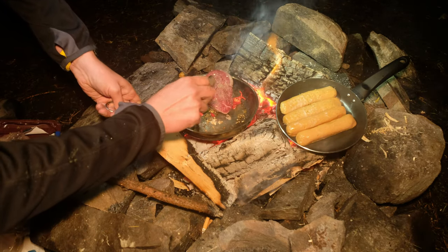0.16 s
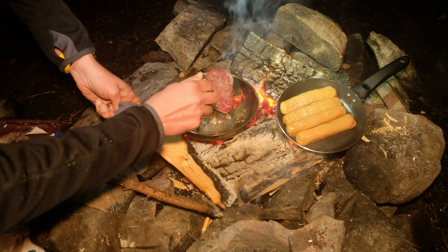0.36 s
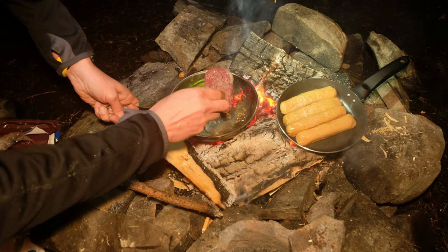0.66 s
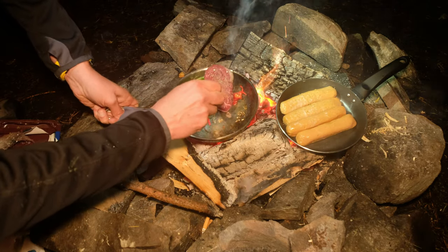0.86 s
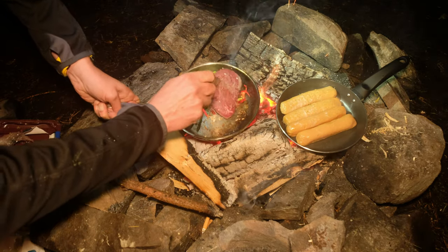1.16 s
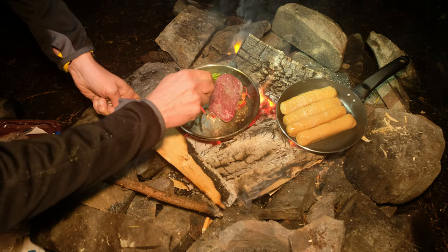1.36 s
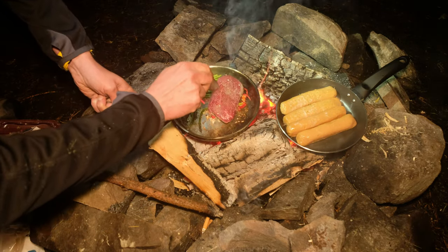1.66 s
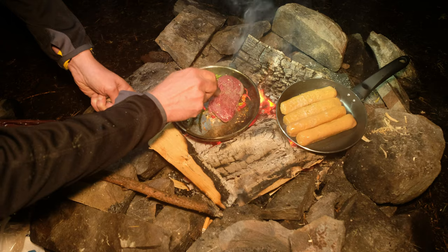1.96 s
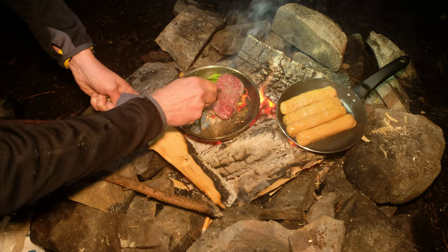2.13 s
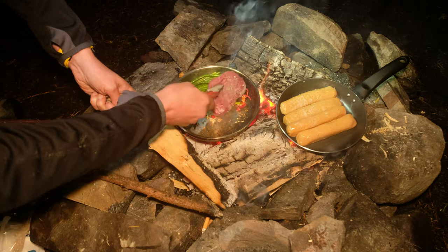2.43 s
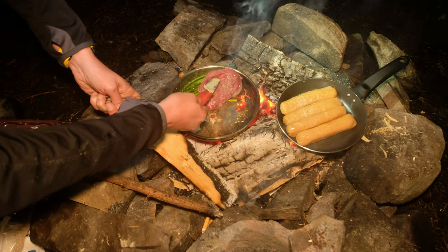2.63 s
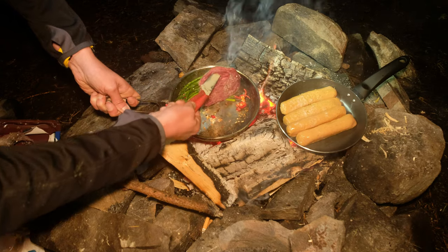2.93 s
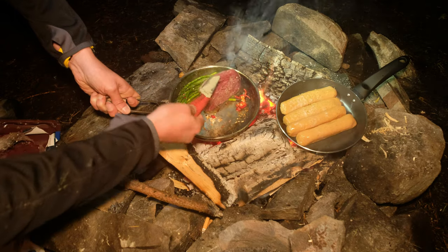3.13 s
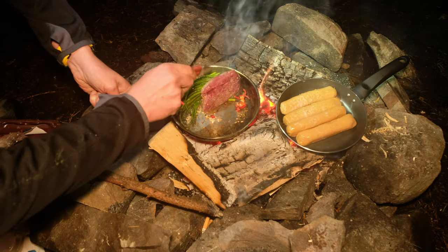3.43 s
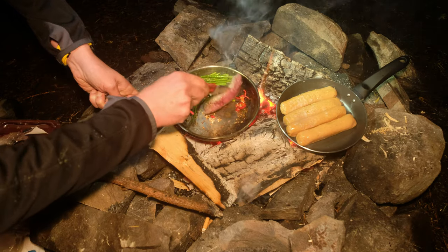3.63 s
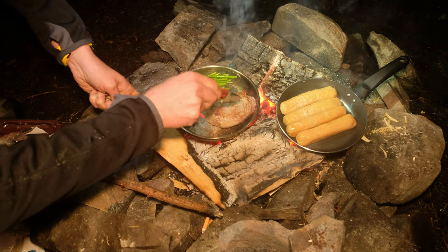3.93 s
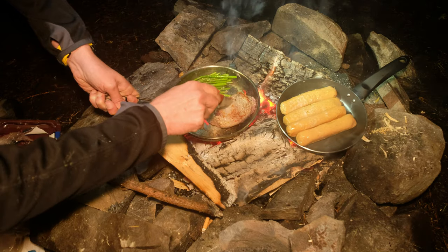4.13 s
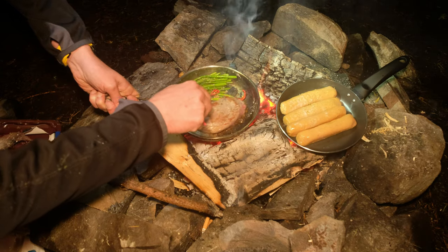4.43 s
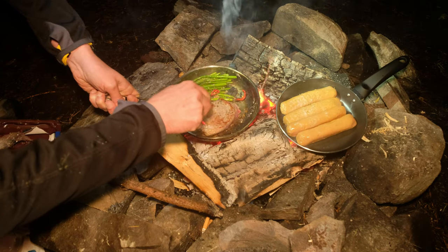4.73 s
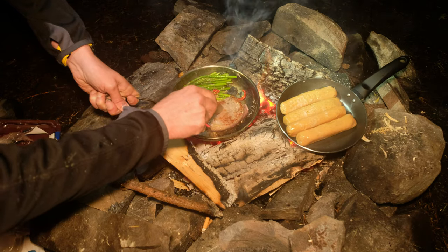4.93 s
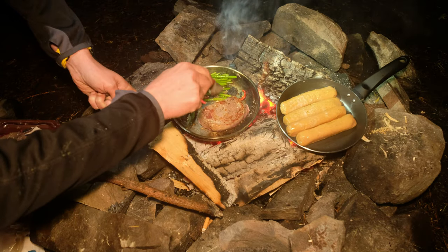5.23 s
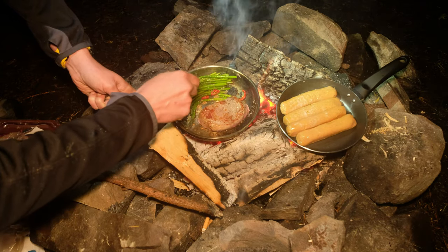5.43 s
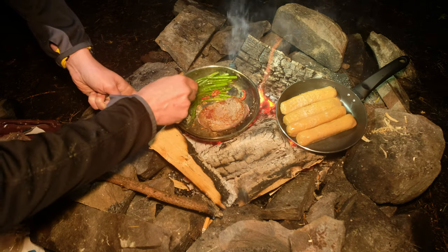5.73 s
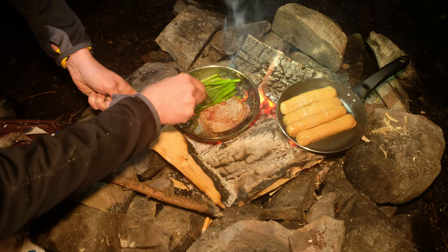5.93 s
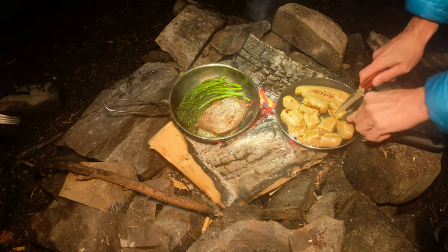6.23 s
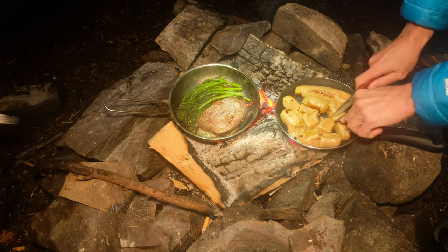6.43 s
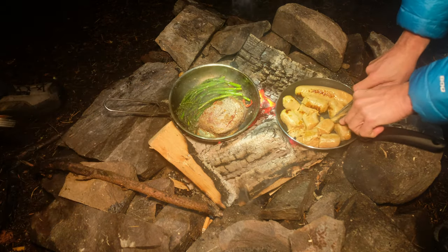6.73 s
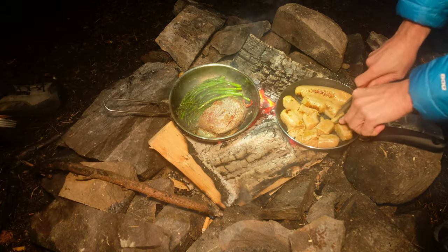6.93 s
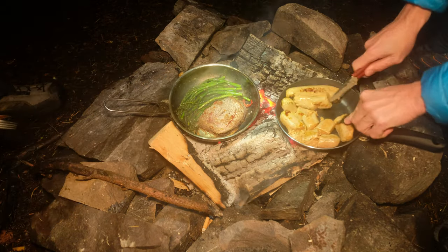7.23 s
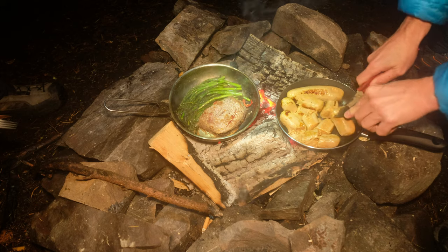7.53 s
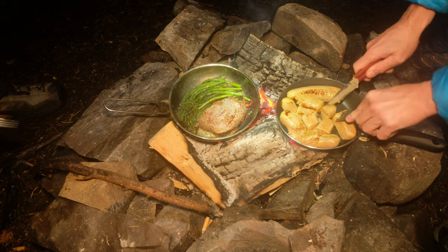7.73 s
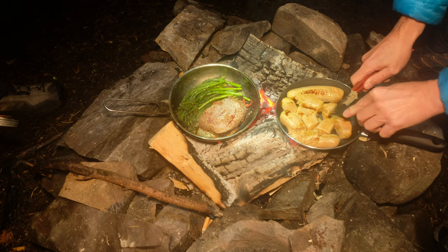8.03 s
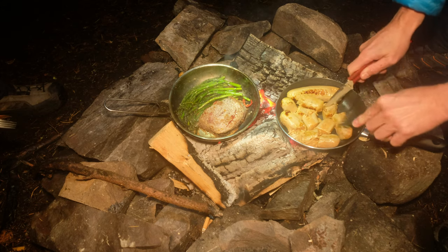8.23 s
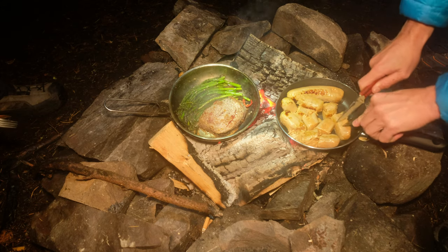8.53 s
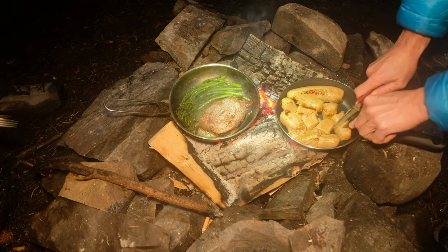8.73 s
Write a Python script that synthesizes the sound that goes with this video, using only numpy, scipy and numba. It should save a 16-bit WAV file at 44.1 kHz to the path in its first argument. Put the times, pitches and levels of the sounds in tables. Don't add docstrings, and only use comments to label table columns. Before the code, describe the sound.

Meat sizzles fiercely in a steel pan over a campfire, spitting and popping, then cuts abruptly to a much quieter simmer with knife knocks.

```python
import sys
import numpy as np
from scipy import signal
from scipy.fft import rfft, irfft
from scipy.io import wavfile
from scipy.ndimage import uniform_filter1d
from numba import njit

SR = 44100
rng = np.random.default_rng(int(sys.argv[2]) if len(sys.argv) > 2 else 0)


def natural_amplitude(level_db):
    exponent = np.asarray(level_db, float) / 20
    return 10 ** exponent


def unload_audio(sound):
    columns = np.transpose(np.atleast_2d(sound))
    steps = np.round(np.clip(columns, -1, 1) * 32767)
    wavfile.write(sys.argv[1], SR, steps.astype(np.int16))


N = 391166
CHANGE_S = 6.099


def grid():
    return np.arange(N) / SR


def by_pan(first, second):
    return np.where(grid() < CHANGE_S, first, second)


def unit(x):
    return x / np.sqrt(np.mean(x ** 2))


def walk(rate_hz):
    hold = int(SR / rate_hz)
    levels = np.repeat(rng.standard_normal(N // hold + 1), hold)
    return 0.53 * uniform_filter1d(levels, hold)[:N]


def colour(x, hz, db):
    f = np.arange(1, N // 2 + 2) * SR / N
    return irfft(rfft(x) * natural_amplitude(np.interp(np.log(f), np.log(hz), db)), N)


def band(x, low_hz, high_hz):
    return signal.sosfilt(signal.butter(2, [low_hz, high_hz], "bandpass", fs=SR, output="sos"), x)


@njit
def rings(start, hz, decay, size, glide, tilt):
    out = np.zeros(N + 1)
    for k in range(len(start)):
        i = start[k]
        w = 2 * np.pi * hz[k] / SR
        p = decay[k] * np.exp(1j * w)
        g = np.exp(1j * w * w * glide / (2 * np.pi))
        z = size[k] * np.exp(1j * tilt) * 1j * (1 - p) / abs(1 - p)
        floor = 0.003 * abs(size[k])
        while i < N and abs(z) > floor:
            out[i] += z.real
            z, p, i = z * p, p * g, i + 1
    return out[:N]


def burst(s, hz, t60_s, size, glide=0., tilt=0.):
    hz = np.clip(hz, 0, 0.42 * SR)
    decay = np.exp(-np.log(1000) / (np.maximum(t60_s, 4 / SR) * SR)) + 0 * hz
    return rings((np.asarray(s) * SR).astype(np.int64), hz, decay, size + 0 * hz, glide, tilt)


def puffs(s, t60_s, db):
    envelope = burst(s, 0 * np.asarray(s), t60_s, natural_amplitude(db), tilt=np.pi / 2)
    return envelope * rng.standard_normal(N)


# frequency in Hz, density in dB per Hz.
FLAME_SPECTRUM = [(12, -47), (20, -12.5), (134, -5), (187, -2), (343, -4.5), (420, -18), (500, -3.5),
                  (650, -9), (1100, -120)]


def fire():
    roar = colour(rng.standard_normal(N), *np.transpose(FLAME_SPECTRUM))
    return unit(roar) * natural_amplitude(by_pan(-58, -64) + 2.3 * walk(1.28) + 0.86 * walk(3.1))


# time in seconds, pitch in Hz, level in dB.
STEAM_JET = [
    (6.905, 4000, -50),
    (6.92, 3800, -36),
    (6.95, 3250, -36),
    (6.972, 2850, -45),
]


def squeak():
    s, hz, db = np.transpose(STEAM_JET)
    on = (grid() > s[0]) * (grid() < s[-1])
    pitch_hz = np.interp(grid(), s, hz) * (1 + 0.01 * walk(180))
    phase = 2 * np.pi * np.cumsum(pitch_hz) / SR
    return on * natural_amplitude(np.interp(grid(), s, db) + 4 * walk(90)) * np.sin(phase)


# frequency in Hz, level in dB, T60 in seconds.
PAN_MODES = [(734, -16.5, 0.084), (1055, -19, 0.082), (1344, -11, 0.14), (1780, -8, 0.045),
             (2430, -4, 0.025), (2995, -0.5, 0.037), (3360, -8, 0.056), (3900, -25, 0.063),
             (4230, -14, 0.02), (4800, -23, 0.081), (5740, -27, 1.7), (6270, -7, 0.0088), (6840, -20, 0.11),
             (7800, -31, 0.062)]
CHATTER_S = 0.0028


def clanks():
    hz, mode_db, t60_s = np.transpose(PAN_MODES)
    t60_s = np.minimum(t60_s, 0.06)
    first_s, second_s = 6.8235, 6.8675
    out = burst([6.87], np.array([190.]), 0.081, natural_amplitude(-28), tilt=-np.pi / 2)
    out = out + band(puffs([first_s + CHATTER_S], 0.15, -18), 150, 1300)
    for s, db in ((first_s, -7), (second_s, -19)):
        scrape = rng.standard_normal(N) * (grid() > s) * (grid() < s + CHATTER_S)
        out = out + natural_amplitude(db - 0.5) * band(scrape, 2400, 7300)
        out = out + band(puffs([s], 0.1, db - 8), 2700, 6200)
        for step in (0, 0.6, 0.9):
            contact_s = s + step * CHATTER_S + 0 * hz
            out = out + burst(contact_s, hz, t60_s, natural_amplitude(db + mode_db - 5.5), tilt=6 * step)
    return out


# time in seconds, peak in dB, low mode in Hz, high mode in Hz,
# high mode level in dB.
KNIFE_KNOCKS = [(0.49, -21.5, 553, 1360, 5), (0.706, -23, 490, 1130, 7), (0.782, -20.5, 516, 581, 4),
                (1.109, -27, 347, 1280, -3), (3.55, -27, 400, 756, 6), (5.369, -11.5, 423, 825, 0),
                (5.42, -15, 385, 660, 13.5), (5.478, -13, 387, 760, 7), (5.954, -14.5, 504, 1160, 0),
                (6.579, -28.5, 480, 947, 6), (6.657, -23.5, 483, 1100, 18.5), (6.768, -39, 495, 1130, 20.5),
                (6.866, -16, 406, 1350, 6), (6.923, -19.5, 372, 720, 3), (6.934, -29, 433, 1140, 11),
                (8.266, -26, 350, 614, -2)]


def knocks():
    s, db, low_hz, high_hz, high_db = np.transpose(KNIFE_KNOCKS)
    t60_s = 0.04
    out = band(puffs(s + 0.0031, 1.1 * t60_s, db - 1.5), 300, 1200)
    for lag_s, blow_db in ((0.0028, -10.5), (0.0135, -32)):
        out = out + burst(s + lag_s, low_hz, 0.66 * t60_s, natural_amplitude(db + blow_db), tilt=-0.64)
        out = out + burst(s + lag_s, high_hz, 0.5 * t60_s, natural_amplitude(db + high_db + blow_db), tilt=-1.45)
    return out


# time in seconds, vigour in dB,
# fineness (share of fine spray) in dB, froth (share of small bubbles) in dB, juice out of the meat in dB.
FRYING = [(0.0, -20, -8, -4.5, -0.2), (1.0, -20.5, -7, -6.5, 1.5), (1.12, -18, -6, -7.5, -0.2),
          (1.32, -17.5, -5, -4.5, 1), (1.92, -20, -4.5, -5.5, 0.2), (2.24, -17, -6.5, -8, 0.4),
          (2.42, -19, -5.5, -6, 3), (2.7, -23, -6, -5, 2.1), (3.12, -18.5, -4, -5.5, 1.5),
          (3.4, -19, -1.5, -6.5, -0.5), (3.98, -22, -4.5, -4, -1.3), (4.32, -20.5, -6.5, -2, -2.2),
          (4.56, -21.5, -4.5, -6, -0.8), (5.0, -18.5, -4.5, -4, -1.8), (5.14, -21.5, -4, -3.5, -0.5),
          (5.64, -21.5, -4, -4, -1), (5.82, -19, -4, -5, 0), (6.098, -20, -4, -4.5, 0.5)]
SIMMERING = [
    (6.14, -34.5, -5, -6, -0.88),
    (7.04, -32.5, -5.5, -5.5, -1),
    (7.67, -32.5, -5.5, -5.5, -1),
    (8.29, -35.5, -5.5, -5.5, -1),
    (8.87, -34.5, -5.5, -5.5, -1),
]


def controls():
    change = [(CHANGE_S, *SIMMERING[0][1:])]
    s, *columns = np.concatenate([FRYING, change, SIMMERING]).T
    return [np.interp(grid(), s, c) for c in columns]


# time in seconds, peak in dB, pitch in Hz.
FIRST_PAN_SPITS = [(0.0604, -5, 3270), (0.4534, -5, 4180), (0.5681, -3, 4310), (0.6904, -3, 2850),
                   (0.7153, -6, 2980), (0.9293, -4, 2850), (1.1734, -4, 3530), (1.3384, -1, 4580),
                   (1.4054, -2, 5300), (1.4604, -4, 4240), (1.5794, -3, 2960), (1.6731, -1, 4160),
                   (1.8971, -3, 3520), (2.14, -4, 2790), (2.2034, -2, 3330), (2.3364, -3, 2910),
                   (2.7237, -8, 2820), (2.9103, -4, 4330), (3.0814, -3, 5140), (3.1114, -1, 6990),
                   (3.7419, -6, 3210), (3.7913, -3, 3020), (4.0926, -4, 5200), (4.1121, -4, 3210),
                   (4.4474, -5, 3250), (4.5634, -5, 4900), (4.6947, -5, 2990), (5.0424, -1, 2880),
                   (5.0689, 1, 2960), (5.6062, -4, 4930)]
SECOND_PAN_SPITS = [(6.1185, -2, 5520), (6.2317, -15, 4540), (6.3234, -16, 6950), (6.334, -14, 6450),
                    (6.3714, -17, 4400), (6.552, -16, 7030), (7.0948, -11, 5470), (7.1074, -15, 4430),
                    (7.1122, -13, 5010), (7.2295, -16, 5470), (7.2973, -13, 5680), (7.5134, -16, 5560),
                    (7.5497, -15, 4190), (7.6291, -11, 5430), (7.8054, -17, 5520), (7.8261, -14, 5350),
                    (7.9633, -15, 5710), (8.1334, -16, 4910), (8.2904, -14, 5810), (8.2994, -14, 6160),
                    (8.3569, -16, 5630), (8.5634, -17, 5080), (8.7784, -19, 4130), (8.8634, -17, 6420)]


def drops():
    small_per_s, lag_s, trim_db = 22, 0.0012, -1
    count = int(small_per_s * N / SR)
    s = rng.random(count) * N / SR
    level_chance, pitch_chance = rng.standard_normal((count, 2)).T
    db = np.interp(s, grid(), controls()[0]) + 12.5 + 1.5 * level_chance
    small = np.array([s, db, 4000 * 2 ** (0.3 * pitch_chance)])
    loud = np.concatenate([FIRST_PAN_SPITS, SECOND_PAN_SPITS]).T + [[lag_s], [trim_db], [0]]
    return np.concatenate([loud, small], axis=1)


def spits():
    s, db, hz = drops()
    loud = np.arange(len(s)) < len(FIRST_PAN_SPITS) + len(SECOND_PAN_SPITS)
    cycles = np.where(loud, 16, 7)
    push = burst(s - 0.35 / hz, hz, 1.5 / hz, natural_amplitude(db - 9), tilt=-0.6)
    suck = burst(s, 0.7 * hz, 4 / hz, -natural_amplitude(db - 7))
    suck = suck + burst(s, 1.7 * hz, 6 / hz, -natural_amplitude(db - 12))
    ring = burst(s, 0.93 * hz, cycles / hz, -natural_amplitude(db - 2), glide=0.025)
    spray = band(puffs(s, 0.016, db - 8.5), 1830, 7100)
    return push + suck + ring + spray


# share in dB, then dB per dB of vigour,
# of fineness, of froth, of juice.
SIZE_RESPONSE = [(-5.5, 0.1, 0.17, 0.23, .3), (-9, 0.26, -0.4, -0.65, 0.71),
                 (-9.5, 0.86, -1.12, -1.04, 1.17), (-4, 0.94, -0.86, -0.42, -0.44),
                 (-4.5, 1.1, -.05, 1.4, 0.13), (-3.5, 1.05, 1.26, -0.15, -0.12), (-4, 1.1, 1.15, .15, 0.12)]


def shares():
    vigour_db, fine_db, froth_db, juice_db = controls()
    usual_db = by_pan(-20, -33.5)
    lull_db = -3.5 * np.exp(-((grid() - 1.04) / 0.022) ** 2)
    swell_db = vigour_db - usual_db + lull_db
    fine_db, froth_db = fine_db + 4.5, froth_db + 5
    return [usual_db + db + a * swell_db + b * fine_db + c * froth_db + d * juice_db
            for db, a, b, c, d in SIZE_RESPONSE]


# pitch in Hz, pitch spread in octaves, ring in cycles, bursts per second,
# size spread in dB, shared pops in dB, trim in dB.
BUBBLE_SIZES = [
    (701, 0.33, 2.7, 2500, 2, -6.5, -17),
    (1335, 0.3, 4, 3000, 3.5, -14.5, -9),
    (2018, 0.15, 3.9, 3500, 2.5, 0.5, -3.5),
    (3079, .15, 6.7, 4500, 2.5, -3.5, -1.5),
    (4920, 0.25, 4.7, 6500, 3., -12.5, -1),
    (7490, 0.306, 5.6, 9000, 2, -14, -1.5),
    (12040, 0.17, 7., 9400, 0, -34, -7),
]


def sizzle():
    seethe_db = 0.46 * walk(14) + 0.98 * walk(60) + 0.45 * walk(250)
    pops = rng.random((14000, 2))
    pop_s = pops[:, 0] * N / SR
    pop_base_db = -3.5 * np.log(pops[:, 1])
    out = 0
    for row, level_db in zip(BUBBLE_SIZES, shares()):
        hz, spread, cycles, rate, size_db, pop_db, trim_db = row
        count = int(min(rate * N / SR, 120000))
        chance = rng.random((count, 2))
        pitch = hz * 2 ** (spread * rng.standard_normal(count))
        size = natural_amplitude(np.minimum(-size_db * np.log(chance[:, 1]), 14))
        fizz = burst(chance[:, 0] * N / SR, pitch, 4.3 * cycles / pitch, size, glide=0.013)
        pop_hz = hz * 2 ** (spread * rng.standard_normal(len(pops)))
        pop_size = natural_amplitude(np.minimum(pop_base_db + 3 * rng.standard_normal(len(pops)), 17))
        crackle = burst(pop_s, pop_hz, 8.0 / pop_hz, -pop_size)
        mix = unit(unit(fizz) + natural_amplitude(pop_db) * unit(crackle))
        out = out + mix * natural_amplitude(level_db + trim_db + seethe_db + 0.71 * walk(20))
    return out * np.clip(abs(grid() - CHANGE_S) / 0.0015, 0, 1)


# frequency in Hz, first pan in dB, second pan in dB.
HEARTH_COLOUR = [(100, 13, 4), (454, -10, -6), (756, -2, -1.5), (1510, -1, -3), (2060, 1, -0.5),
                 (2230, 0.5, 0), (3440, -1.5, -4), (3670, -5, -0.5), (4420, 1, 0.5), (5600, 0, 1.5),
                 (6720, -3.5, 1.5), (6480, 0.5, 1), (9400, -0.5, 1.5), (15500, -3.5, -2)]


def hearth(fat):
    hz, first_db, second_db = np.transpose(HEARTH_COLOUR)
    return by_pan(colour(fat, hz, first_db), colour(fat, hz, second_db))


def scene():
    pans = hearth(sizzle() + spits()) + knocks() + clanks()
    pans = signal.sosfilt(signal.butter(2, 230, "highpass", fs=SR, output="sos"), pans)
    return np.tile(pans + squeak() + fire(), (2, 1))


def band_limit(x):
    return signal.sosfilt(signal.butter(12, 16200, fs=SR, output="sos"), x)


def record(dry):
    top_cut = signal.ellip(14, 0.3, 90, 15700, fs=SR, output="sos")
    mix = signal.sosfilt(top_cut, np.clip(dry, -1, 1))
    return band_limit(mix)


dry = scene()
out = record(dry)
unload_audio(out)
```